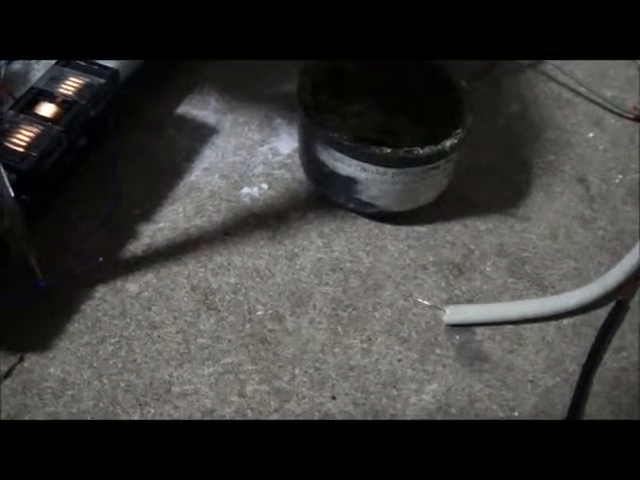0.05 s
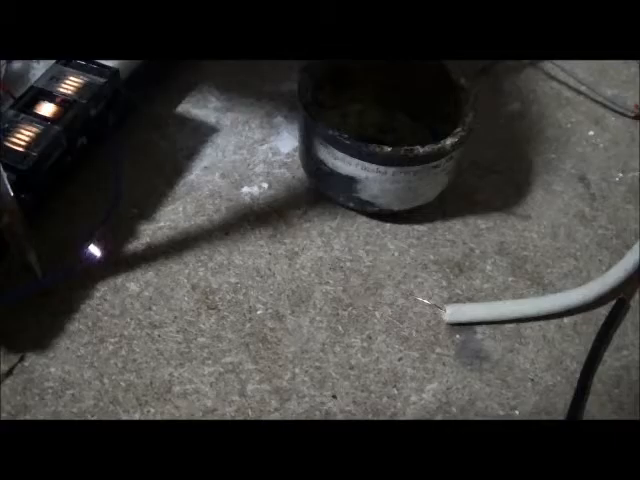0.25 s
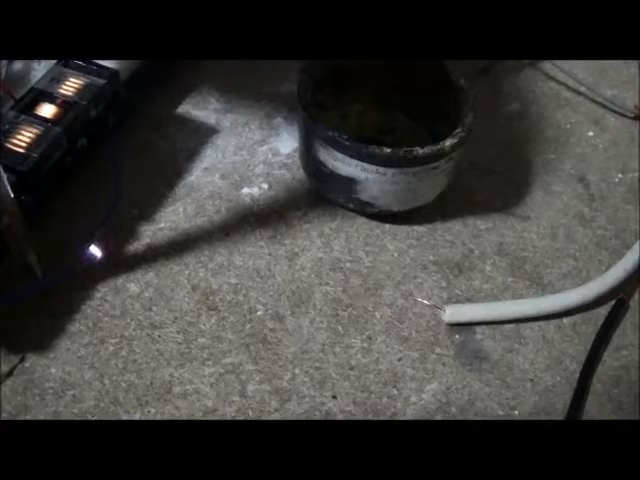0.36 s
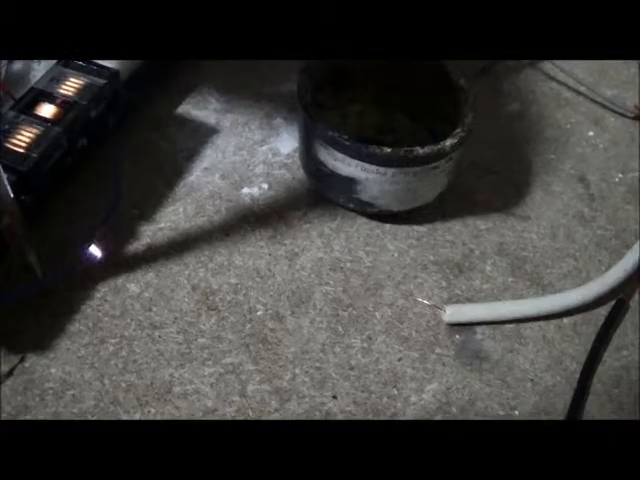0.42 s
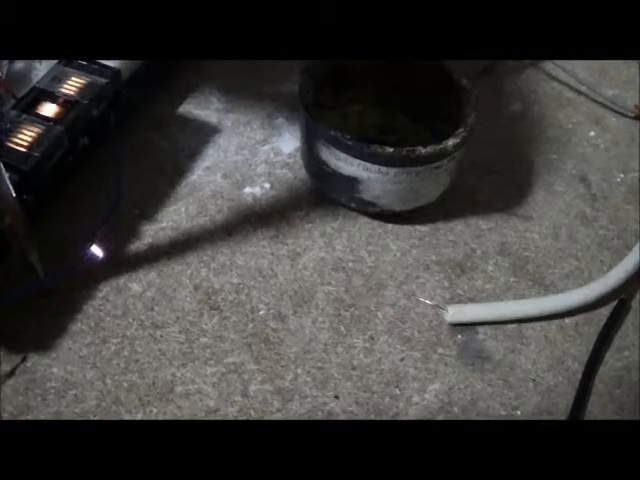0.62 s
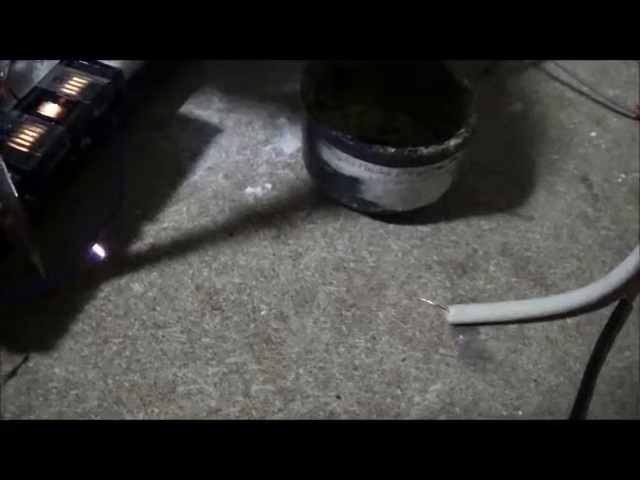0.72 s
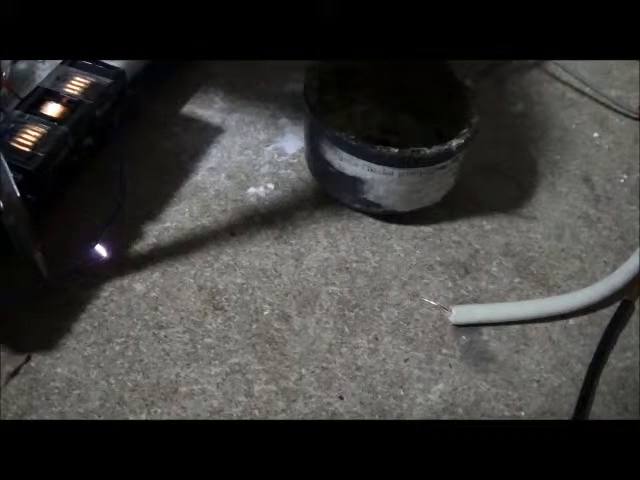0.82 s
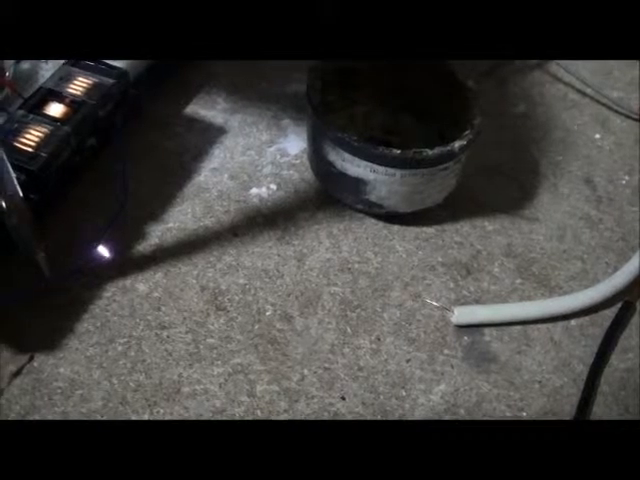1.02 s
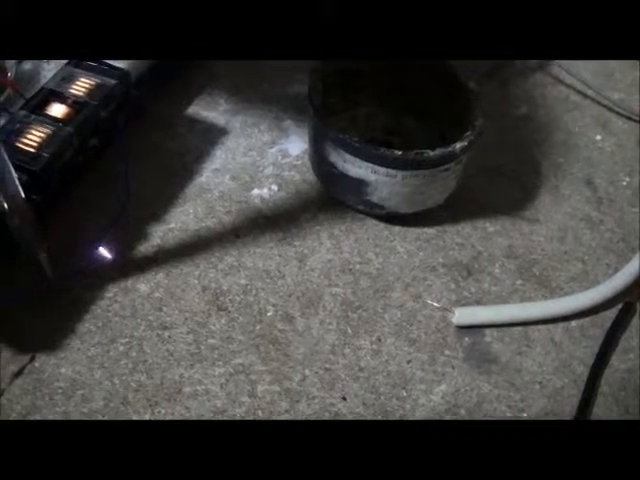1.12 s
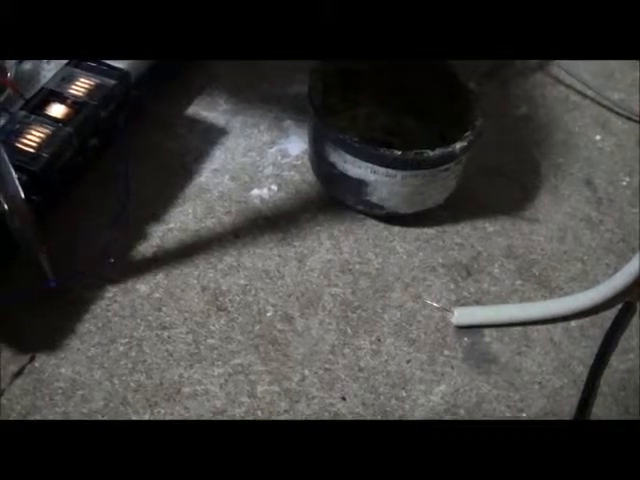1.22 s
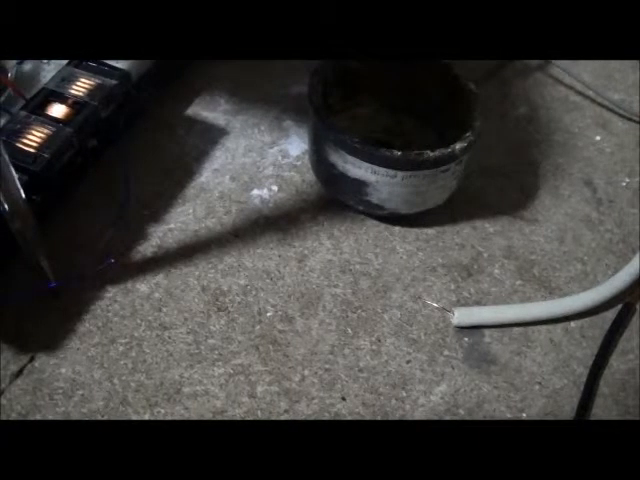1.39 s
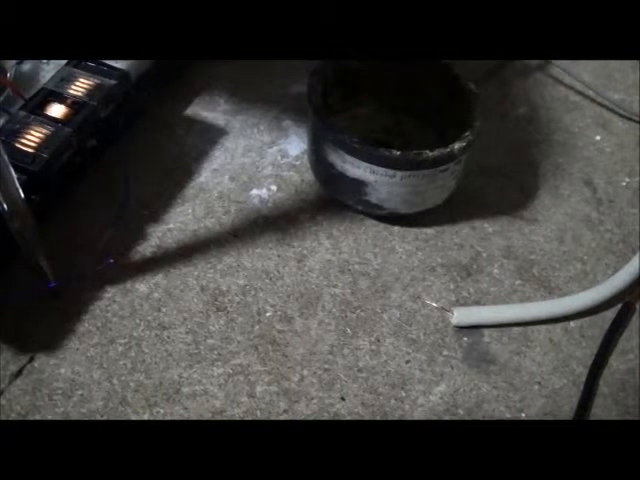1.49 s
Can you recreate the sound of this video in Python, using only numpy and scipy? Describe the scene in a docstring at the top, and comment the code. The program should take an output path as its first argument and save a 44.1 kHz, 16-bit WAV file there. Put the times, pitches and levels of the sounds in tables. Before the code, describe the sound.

A small electric arc strikes with a stutter and buzzes close by, harsh and hissing. After about a second it sputters, crackles and dies with a last snap, over faint background noise in a room with a short echo.

```python
"""A small high-voltage arc buzzes close by on a concrete floor, fed from 50 Hz mains.
It strikes and fires a burst of tiny, bright sparks in every cycle, then sputters on the opposite
half-cycle and dies with a last snap. A faint corona fizzes once a cycle, and soft knocks mark the
arc's start and end. The sparks ring in a short room; a faint hum, rumble and hiss lie underneath."""
import sys
import numpy as np
from scipy import signal
from scipy.fft import rfft, irfft
from scipy.io import wavfile
from scipy.ndimage import uniform_filter1d

SR = 44100
rng = np.random.default_rng(int(sys.argv[2]) if len(sys.argv) > 2 else 0)


def master_out(mix):
    """Clip the mix to full scale and print it as 16-bit PCM to the path in sys.argv[1]."""
    frames = np.transpose(np.atleast_2d(mix))
    ceiling = np.clip(frames, -1, 1)
    pcm = np.round(ceiling * 32767).astype(np.int16)
    wavfile.write(sys.argv[1], SR, pcm)


N = 68355
T = np.arange(N) / SR
MAINS_HZ = 50


# Spark density through one mains cycle: time_ms, base_sparks_per_s
ARC_CYCLE = [(0, 400), (1.2, 1900), (2.8, 7500), (8.5, 7000), (10.3, 4800), (12.3, 3000), (14.8, 1000),
             (16.5, 250), (18.5, 100)]
# The sparks quicken as the arc burns: time_s, rate_factor
ARC_PACE = [(.25, 0.91), (.45, 0.9), (.66, 1.025), (.75, 1.1), (.9, 1.23)]
# A stuttering strike, a sustain and a fade: time_s, level_db
ARC_LEVEL = [(.208, -47), (.218, -49.5), (.232, -25.5), (.244, -50), (.25, -25.5), (.254, -45), (.262, -29),
             (.4, -28.5), (.55, -28), (.68, -30), (.8, -31), (.87, -33), (.915, -39.5), (.945, -47.5)]

def arc():
    """The main buzz: the burning arc fires a dense burst of sparks in every mains cycle."""
    pace = np.interp(T, *np.transpose(ARC_PACE))
    buzz = sparks(ARC_CYCLE, start_ms=19.2, jitter=.21, size_db=1.76, wander=.12,
                  flicker_db=-.1, spit_db=1.54, growth=.11, pace=pace)
    return buzz * gated(ARC_LEVEL)


def sparks(cycle, start_ms, jitter, size_db, wander, flicker_db, spit_db, growth, pace=1):
    """The gap charges and breaks down over and over at a rate that follows the mains; no cycles match."""
    gaps, sizes, spits = rng.standard_normal((3, N))
    knots = np.arange(0, 2, 1 / (6 * MAINS_HZ))
    drift, flicker = (np.interp(T, knots, row) for row in rng.standard_normal((2, len(knots))))
    cycle_ms = (T * 1000 - start_ms) % (1000 / MAINS_HZ)
    time_ms, per_s = np.transpose(cycle)
    rate = pace * np.maximum(np.interp(cycle_ms, time_ms, per_s), 0) * np.exp(wander * drift)
    # A spark fires each time the charge passes the next uneven threshold.
    charge = np.cumsum(rate + 1) / SR
    thresholds = np.cumsum(np.exp(jitter * gaps - jitter ** 2 / 2))
    place = np.interp(thresholds[thresholds < charge[-1]], charge, np.arange(N))
    whole, part = place.astype(int), place % 1
    size = amp(size_db * sizes[:len(place)])
    size *= ((rate[whole] + 1) / per_s.max()) ** growth  # denser sparks hit harder
    train = np.bincount(whole, size * (1 - part), N + 1) + np.bincount(whole + 1, size * part, N + 1)
    train = train[:N] - uniform_filter1d(train[:N], size=71)  # thin out the lows
    uneven_db = flicker_db * flicker + spit_db * evened(uniform_filter1d(spits, size=35))
    return train * amp(uneven_db) * np.sqrt(SR / per_s.max())


# Two spurts in each mains cycle: time_ms, base_sparks_per_s
SPUTTER_CYCLE = [(0, -5), (1.2, 1), (1.8, 10000), (3.2, 8500), (4.6, 1300), (5.8, 1500), (7.2, 5500),
                 (9.5, 5499.5), (11.8, -0.5)]
# The sputter surges and sags: time_s, level_db
SPUTTER_LEVEL = [(.76, -40), (.88, -35.5), (.94, -36), (.98, -33.5), (1.04, -37), (1.056, -46),
                 (1.075, -38.5), (1.095, -35), (1.135, -40.5), (1.177, -36.5), (1.196, -45), (1.203, -52),
                 (1.216, -55)]

def sputter(end_s=1.2155):
    """The dying arc spits raggedly on the opposite half-cycle, then cuts out."""
    crackle = sparks(SPUTTER_CYCLE, start_ms=11, jitter=.36, size_db=2.5, wander=.22,
                     flicker_db=.5, spit_db=1, growth=0)
    return crackle * gated(SPUTTER_LEVEL) * (T < end_s)


# Single loud snaps: start_s, level_db, length_s, sparks_per_s
SNAPS = [(0.219, -31, .007, 4300), (0.347, -38, .001, 8000), (0.4012, -37, .0008, 11000),
         (0.462, -34, .0012, 5700), (0.5486, -32, 0.00096, 8000), (0.8009, -34, .003, 9240),
         (0.8953, -35.5, .001, 8100), (0.9347, -33.5, 0.0011, 10600), (0.9714, -32, .0018, 8450),
         (1.0143, -36.5, .0012, 9100), (1.0334, -33, .001, 7600), (1.057, -37, .001, 9000),
         (1.0712, -38.5, .0012, 9000), (1.111, -32.5, .0015, 9000), (1.1334, -34.5, .0012, 10000),
         (1.1383, -32.5, 0.0013, 9800), (1.1556, -34, .0012, 9000), (1.197, -35.5, .0012, 5200),
         (1.2116, -33, .0012, 11300), (1.2393, -32, .0003, 24000), (1.2473, -31.5, .0045, 6000)]

def snaps(jitter=.46):
    """The gap restrikes with a short, fast volley of strong sparks."""
    train = np.zeros(N)
    for (start, db, length, per_s), gaps in zip(SNAPS, rng.standard_normal((len(SNAPS), 100))):
        delays = np.append(0, np.cumsum(np.exp(jitter * gaps)) / per_s)
        delays = delays[delays < length]
        train[np.round((start + delays) * SR).astype(int)] += amp(db) * np.sqrt(SR / per_s)
    return train - uniform_filter1d(train, size=111)


# One short puff in each mains cycle: time_ms, base_sparks_per_s
CORONA_CYCLE = [(0, 0), (.7, 9000), (4, 9000), (4.8, 0)]
# The fizz swells into the strike, then ebbs: time_s, level_db
CORONA_LEVEL = [(0, -58.5), (.08, -58), (.16, -57.5), (.197, -50), (.22, -47.5), (1.2, -58), (1.32, -59),
                (1.55, -62.5)]

def corona():
    """A faint discharge fizzes once a cycle from start to finish."""
    fizz = sparks(CORONA_CYCLE, start_ms=15.2, jitter=.3, size_db=5, wander=.1,
                  flicker_db=1.3, spit_db=.5, growth=.033)
    return fizz * held(CORONA_LEVEL)


# Tone colour of one spark: frequency_hz, gain_db
SPARK_COLOUR = [(100, -26), (400, -19), (650, -11.5), (1000, -13.5), (1500, -11.5), (2000, -7),
                (2900, -8.5), (3350, -8), (4000, -13), (5050, -7), (5500, -11.5), (6700, -3), (7200, -8),
                (7580, 1.5), (8150, -5), (8900, 4.5), (9750, -4.5), (10350, 4), (10850, -1.5),
                (11500, -12.5)]
# Stereo placement: frequency_hz, left_minus_right_db
SPARK_PAN = [(60, -19), (140, -10), (350, 0.5), (840, 2.5), (2020, 1), (4870, 4), (11700, 5)]

def spark_ring(train):
    """Gives every spark its bright, ringing click, stronger on the left."""
    hz = np.fft.rfftfreq(4096, 1 / SR)
    colour_db, pan_db = curve(SPARK_COLOUR, hz), curve(SPARK_PAN, hz)
    click = np.array([impulse(colour_db + side * pan_db / 2) for side in (1, -1)])
    click /= np.sqrt((click ** 2).sum(1).mean())
    return signal.fftconvolve(train[None], click, axes=1)[:, :N]


# Reverb time, longest in the upper mids: frequency_hz, t60_s
ROOM_DECAY = [(300, 0.1), (3000, 0.39), (10000, 0.17)]

def room(direct, early_db=-9, early_decay_s=.0036, tail_db=-14, shared=.9):
    """Quick echoes from the floor and nearby things, then a short diffuse tail."""
    t = T[:SR // 2]
    early, tail = rng.standard_normal((2, 3, len(t)))
    early = early[:2] * np.exp(-t / early_decay_s) * (t > .0003)
    tail = (tail[:2] + shared * tail[2]) * (t > .004)
    hz, frame_s, bands = signal.stft(tail, SR, nperseg=256)
    decay = np.exp(-np.log(1000) * frame_s / curve(ROOM_DECAY, hz)[:, None])
    tail = signal.istft(bands * decay, SR, nperseg=256)[1][:, :len(t)]
    echo = amp(early_db) * early / np.linalg.norm(early[0])
    echo += amp(tail_db) * tail / np.linalg.norm(tail[0])
    return direct + signal.fftconvolve(direct, echo, axes=1)[:, :N]


# Two soft knocks: start_s, level_db
KNOCKS = [(.192, -46), (1.282, -60)]
# The body of a knock: pitch_hz, gain_db, t60_s
KNOCK_MODES = [(446, -1.5, 0.12), (546, -8, 0.058)]

def knocks(attack_s=.0036):
    """A dull, quickly damped ring as the arc starts and stops."""
    out = np.zeros(N)
    for start, db in KNOCKS:
        t = np.maximum(T - start, 0)
        ring = sum(amp(gain_db) * np.exp(-np.log(1000) * t / t60) * np.sin(2 * np.pi * hz * t)
                   for hz, gain_db, t60 in KNOCK_MODES)
        out += np.minimum(t / attack_s, 1) * amp(db) * ring
    return out


# The hum drops away early and lingers: time_s, level_db
HUM_LEVEL = [(0, -56), (.1, -64), (.14, -76), (.5, -76), (1.55, -81)]

def hum(pitch_hz=292, waver_hz=9):
    """A faint tone with a wavering pitch."""
    hz = pitch_hz + waver_hz * evened(uniform_filter1d(rng.standard_normal(N), size=1500))
    return held(HUM_LEVEL) * np.sin(2 * np.pi * np.cumsum(hz) / SR)


# Tone colours of the three noise beds: frequency_hz, gain_db
HISS_COLOUR = [(59, -28), (100, -33), (184, -7), (228, -17), (289, -10), (404, -17.5), (941, -20.5),
               (1310, -20.5), (1730, -20.5), (2950, -26.5), (11000, -21.5), (14300, -79), (22000, -120)]
RUMBLE_COLOUR = [(20, -22), (25, -4), (30, -7.5), (36, 0), (46, -4.5), (65, -12.5), (110, -23),
                 (200, -34.5), (2500, -82)]
DRONE_COLOUR = [(40, -10), (66, 0), (95, -1), (140, -10), (178, 3.5), (230, -7.5), (292, -2.5),
                (380, -11.5), (700, -14.5), (1100, -16.5), (2500, -30.5), (8000, -49.5)]
# Their uneven fades: time_s, level_db
RUMBLE_LEVEL = [(0, -48), (.12, -51), (.3, -57), (.65, -53), (.9, -58), (1.2, -63.5), (1.55, -65)]
DRONE_LEVEL = [(0, -55.5), (.11, -62.5), (.2, -58.5), (.6, -63), (1, -67), (1.55, -73.5)]

def background(hiss_db=-64.5):
    """Faint steady hiss, with a low rumble and a hollow drone that fade."""
    hiss = amp(hiss_db) * noise_bed(HISS_COLOUR)
    rumble = held(RUMBLE_LEVEL) * noise_bed(RUMBLE_COLOUR)
    drone = held(DRONE_LEVEL) * noise_bed(DRONE_COLOUR)
    return hiss + rumble + drone


# Stereo image of the beds: frequency_hz, left_right_correlation
BED_IMAGE = [(60, 0.99), (220, 0.98), (840, 0.4), (3130, 0.15), (11700, 0.62)]

def noise_bed(colour):
    """Coloured stereo noise of rms 1, centred in the bass and wider above."""
    hz = np.fft.rfftfreq(N, 1 / SR)
    mid, side = rfft(rng.standard_normal((2, N)))
    alike = np.clip(curve(BED_IMAGE, hz), 0, 1)
    mid, side = mid * np.sqrt(1 + alike), side * np.sqrt(1 - alike)
    return evened(irfft(np.array([mid + side, mid - side]) * amp(curve(colour, hz)), N))


def amp(db):
    """Decibels to gain."""
    return 10 ** (np.asarray(db) / 20)


def evened(x):
    """Scales to rms 1."""
    return x / np.sqrt(np.mean(x ** 2) + 1e-20)


def curve(points, hz):
    """Reads a table on a log-frequency axis."""
    frequency_hz, value = np.transpose(points)
    return np.interp(np.log(hz + 1), np.log(frequency_hz + 1), value)


def held(points):
    """Gain envelope through time_s, level_db points, holding its end values."""
    return amp(np.interp(T, *np.transpose(points)))


def gated(points):
    """The same envelope, silent outside its points."""
    return held(points) * (T >= points[0][0]) * (T <= points[-1][0])


def impulse(gain_db):
    """The tightest click with this gain curve (minimum phase)."""
    cepstrum = irfft(np.log(amp(gain_db)))
    half = len(cepstrum) // 2
    cepstrum[1:half] *= 2
    cepstrum[half + 1:] = 0
    return irfft(np.exp(rfft(cepstrum)))[:half]


def scene():
    """All the sparks ring in the room, over the knocks and the quiet bed."""
    bed = background() + hum() + knocks()
    discharge = arc() + sputter() + corona() + snaps()
    return bed + room(spark_ring(discharge))


def record(dry):
    """A steep low-pass takes off the very top."""
    cutoff_hz = 10950
    return signal.sosfilt(signal.butter(30, cutoff_hz, fs=SR, output="sos"), dry)


dry = scene()
out = record(dry)
master_out(out)
```